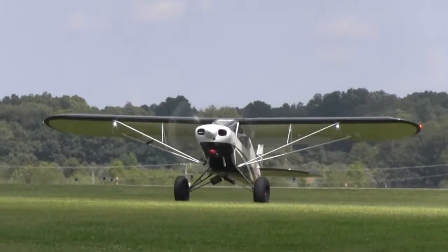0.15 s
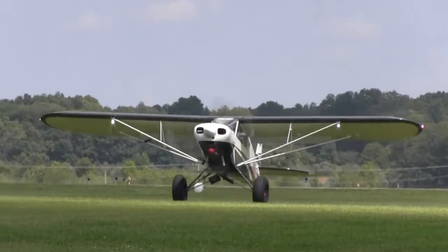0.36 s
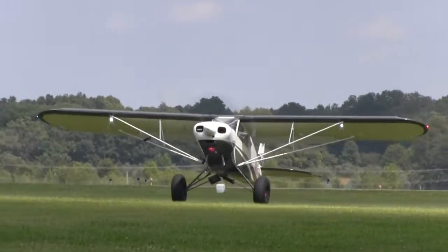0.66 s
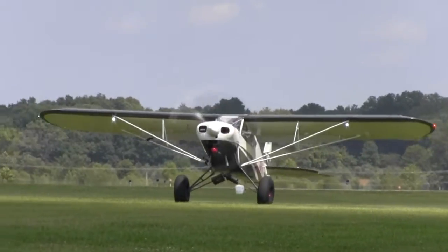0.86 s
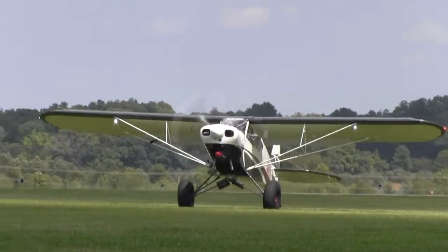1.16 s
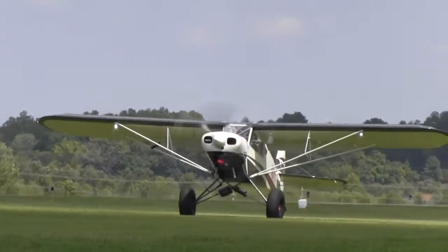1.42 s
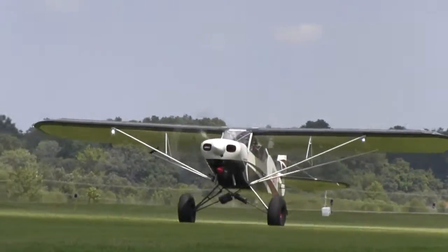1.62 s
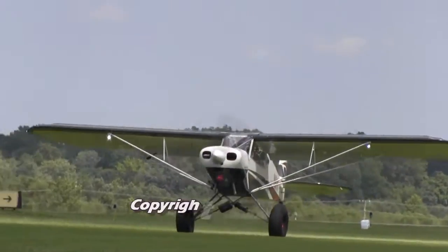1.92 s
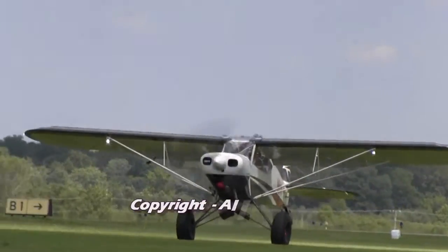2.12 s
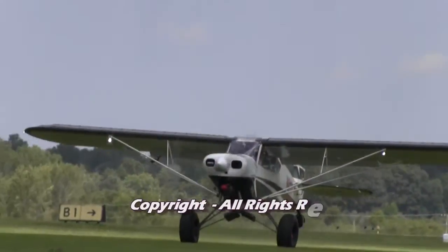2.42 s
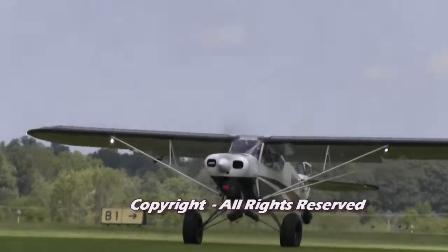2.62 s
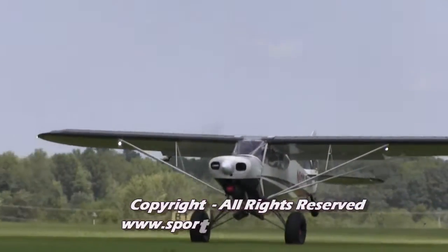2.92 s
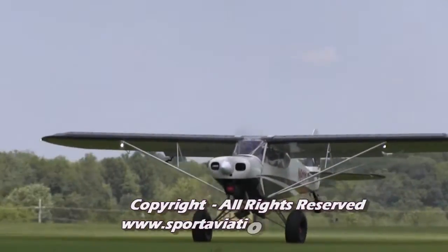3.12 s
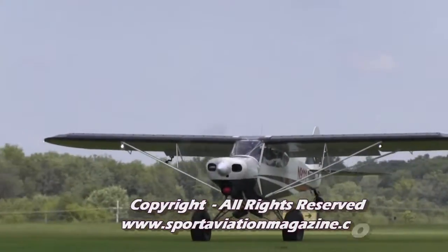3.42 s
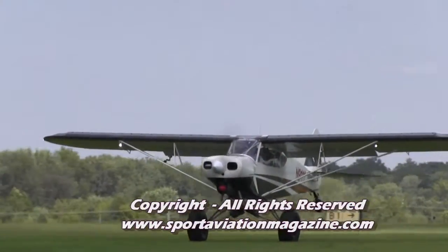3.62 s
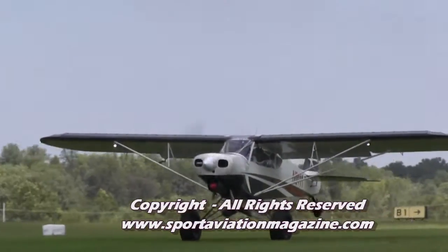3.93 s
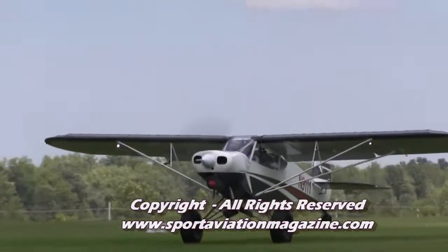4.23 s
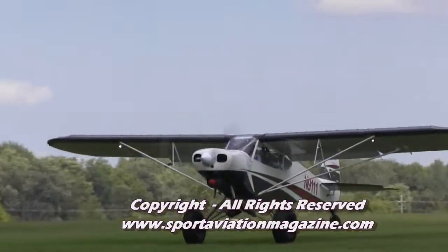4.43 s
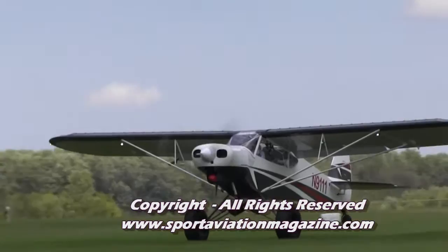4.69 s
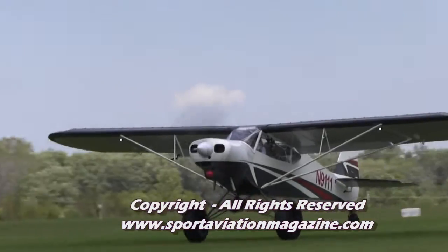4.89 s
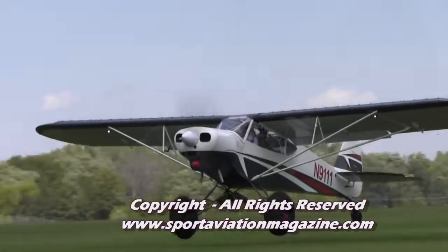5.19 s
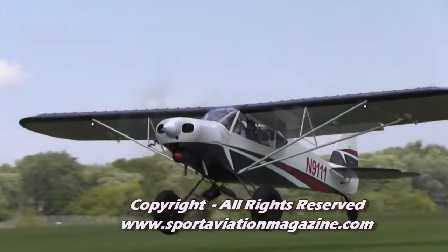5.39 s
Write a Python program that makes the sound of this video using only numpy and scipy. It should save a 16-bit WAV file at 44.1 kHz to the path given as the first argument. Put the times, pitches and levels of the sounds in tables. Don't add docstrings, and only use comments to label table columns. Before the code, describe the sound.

Outdoors on an open grass airstrip, a four-cylinder propeller aircraft runs at full power toward a stereo microphone. A low, buzzing drone starts fairly distant and wavers in the air, with faint cricket chirps on the right in the first second and a half. The engine note creeps slightly upward as boom and airy hiss swell, loudest near five seconds, then holding strong, still close, at the end.

```python
import sys
import numpy as np
from scipy import signal
from scipy.fft import rfft, irfft
from scipy.io import wavfile
from scipy.ndimage import uniform_filter1d

SR = 44100
rng = np.random.default_rng(int(sys.argv[2]) if len(sys.argv) > 2 else 0)


def undo_db(level):
    steps = np.asarray(level, float) / 20
    return 10 ** steps


def digitize_waveform(pressure):
    field = np.atleast_2d(pressure).T
    bounded = np.clip(field, -1, 1)
    quanta = np.round(bounded * 32767).astype(np.int16)
    wavfile.write(sys.argv[1], SR, quanta)


N = 244755
TIME = np.arange(N) / SR


def evened(x):
    return x / np.sqrt(np.mean(abs(x) ** 2) + 1e-20)


def read(points, hz, axis=1):
    rows = np.transpose(points)
    return np.interp(np.log(hz + 1), np.log(rows[0] + 1), rows[axis])


def bell(u):
    return np.exp(-u ** 2 / 2)


def drift(rate_hz, count=1):
    spectrum = rfft(rng.standard_normal((count, N)))
    lowpass = np.exp(-(np.fft.rfftfreq(N, 1 / SR) / rate_hz) ** 2)
    return evened(irfft(spectrum * lowpass, N))


def over_time(table):
    return np.interp(TIME, *np.transpose(table))


STAGES = [
    1.0,
    3.6,
    4.82,
]


def approach(values):
    return np.interp(TIME, STAGES, values)


# time_s, speed_rpm
SPEED = [(0.0, 2446.0), (0.5, 2469.8), (1.01, 2479.7), (1.51, 2497.9), (2.02, 2511.4), (2.52, 2527.6),
         (3.03, 2544.6), (3.53, 2560.4), (4.04, 2577.4), (4.54, 2594.5), (5.05, 2603.9), (5.55, 2620.7)]


def cycle():
    return np.cumsum(over_time(SPEED)) / 120 / SR


# place in the cycle (0-1) far, midway, close; level_db far, midway, close
CYLINDERS = [(0.878, 0.863, 0.858, 0, 0, 0), (0.107, 0.106, 0.085, -0.1, -1.4, -8.3),
             (0.3, 0.346, 0.391, -8.7, -9.4, -8.8), (0.596, 0.603, 0.568, -2.8, -9.8, -8.4)]
# time_s, level_db
BOOM_LEVEL = [(0.0, -31.0), (0.7, -27.5), (1.25, -29), (1.55, -27), (1.95, -28), (2.4, -25.5),
              (3.02, -24.5), (3.6, -23), (4.1, -20.5), (4.77, -17.5), (5.2, -20.5), (5.55, -21)]
RING_PHASE = [0.25, -0.36, -0.99]
# multiple of the cycle rate, level_db far, midway, close
ORDERS = [(4, -8.5, -17, -9), (5, -22, -26, -37), (6, -20, -26, -16), (7, -20.5, -23, -18),
          (8, -2, -13.5, 0.5), (9, -4, -11.5, -1.5), (10, -7, -8, -1), (11, -1, -9, 2), (12, 3, 0.5, 0),
          (13, -8.5, -14, 3), (14, -29, -14.5, -10), (15, -7, -22, -9), (16, -8, -6.5, 2.5),
          (17, -14, -34, -9.5), (18, -37, -33, -11), (19, -53, -31, -34), (20, -14, -25.5, -23),
          (21, -48, -45, -49), (22, -32, -57, -55), (23, -47, -41, -26), (24, -50, -33.5, -18),
          (25, -50, -30, -56), (26, -37, -54, -21), (27, -60, -55, -33), (28, -34, -30.5, -11),
          (29, -23.5, -21.5, -12), (30, -28, -32, -33), (31, -32, -30, -15.5), (32, -25, -23, -11.5),
          (33, -50, -37, -9.5)]
UPPER_LEVEL = [-29, -22, -23.5]
MID_ORDER_LEAD = [1.1, .4, -.3]


def boom(turns):
    tailpipe_order, fall_db_per_order, upper_scatter_db = 42.45, 0.96, 3.5
    lead_order, uneven_firing_db = 16, 0.7
    place, pulse_db = np.split(np.array(CYLINDERS), 2, axis=1)
    flutter = drift(1.75, count=4)
    upper_db = np.add(UPPER_LEVEL, upper_scatter_db * rng.standard_normal(size=(21, 3)))
    upper = []
    for order, row in enumerate(upper_db, start=34):
        upper.append((order, *(row - fall_db_per_order * abs(order - tailpipe_order))))
    out, power = np.zeros(N), 1e-12
    for order, *stage_db in ORDERS + upper:
        order = round(order)
        pulses = -np.sum(undo_db(pulse_db) * np.exp(-2j * np.pi * order * place), axis=0)
        phase = approach(np.unwrap(np.angle(pulses) + RING_PHASE))
        phase -= max(order - 18, 0) ** 2 / 30
        phase += bell((order - lead_order) / 2) * approach(MID_ORDER_LEAD)
        size = undo_db(approach(stage_db))
        shaken = (order / 12) ** 1.64 * flutter
        phase += 0.05 * shaken[order % 2]
        fading = undo_db(0.5 * shaken[2 + order % 2])
        out += size * fading * np.cos(2 * np.pi * order * turns + phase)
        power += size ** 2 / 2
    level_db = over_time(BOOM_LEVEL) + uneven_firing_db * drift(39.0)[0]
    return undo_db(level_db) * out / np.sqrt(power)


# place in the cycle (0-1),
# level_db far, midway, close
PUFFS = [
    (.80, 0, 2.5, -5),
    (0.03, -3.5, -2, -19),
    (0.26, -0.5, 3, -6),
    (0.5, -7, 3, -9),
    (0.07, -13, -20, 0.5),
]
WASH = [0.31, 0.21, 0.59]
CRACKLE = [-0.9, 0.5, 1.2]


def puffs(turns):
    chance = rng.standard_normal((int(turns[-1]) + 3, len(PUFFS)))
    size_db = 0.96 * np.clip(chance, -2, 1.6)
    power = approach(np.abs(WASH))
    for column, (place, *stage_db) in enumerate(PUFFS):
        since = turns - place + 1
        age = since % 1
        peak = undo_db(approach(stage_db) + size_db[since.astype(int), column]) ** 2
        power += peak * 2.46 * (1 - np.exp(-age / 0.04)) * np.exp(-age / 0.05)
    rasp = undo_db(approach(CRACKLE) * drift(330.0)[0])
    return evened(rasp * np.sqrt(power / uniform_filter1d(power, size=8000)))


# time_s, level_db
RUSH_LEVEL = [(0.0, -40), (0.5, -37.5), (1.0, -37.5), (1.5, -37.5), (1.9, -36), (2.25, -33), (2.6, -32.5),
              (3.05, -27.5), (3.4, -30.5), (3.75, -29), (4.1, -26), (4.45, -23.5), (4.75, -19), (5.0, -16),
              (5.2, -18.5), (5.4, -16.5), (5.55, -17)]
# pitch_hz, density_db (per Hz)
RUSH_SHAPE = [(480, -22.5), (650, -7), (1000, -0.5), (3500, 1), (6000, -4), (9500, -12.5), (14000, -21),
              (15700, -31)]
# pitch_hz, likeness (0-1)
LIKENESS = [(300, .98), (520, 0.25), (700, 0.95), (1500, 0.99), (2200, 0.82), (3500, 0.93), (5500, 0.96),
            (8000, 0.79), (11000, 0.87), (13000, 0.96)]
# middle_s, pitch_hz, level_db, spread_s
GUSTS = [(0.28, 970, -2.5, 0.072), (1.46, 3350, 4, 0.068), (1.99, 5000, 2, 0.12), (2.09, 1500, -3, 0.051),
         (2.3, 5400, -2.5, 0.06), (2.54, 4420, 4, 0.075), (2.65, 1900, 3.5, 0.25), (2.79, 1450, 1, 0.21),
         (3.07, 3500, 5, 0.08), (3.17, 1690, -2, 0.11), (3.52, 2600, -2.5, 0.022), (3.83, 1340, -4.5, 0.13),
         (3.87, 750, -3, 0.5), (3.87, 9030, 1.5, 0.091), (4.18, 1910, -1.5, 0.07),
         (4.21, 8490, -3.5, 0.069), (4.46, 3230, -2, 0.37), (4.56, 12400, 2.5, 0.54),
         (4.77, 2140, -2.5, 0.06), (4.98, 2640, 4, 0.067), (5.09, 1030, -2.5, 0.049),
         (5.36, 6900, -3.5, 0.05), (5.46, 3440, 5.5, 0.025), (5.5, 920, -5, 0.027)]
# middle_s, pitch_hz, level_db, spread_s
EDDIES = [(0.35, 2610, 6.0, 0.076), (0.7, 660, -16, 0.25), (0.91, 1290, 5.0, 0.2), (1.39, 2650, 3, 0.5),
          (1.46, 940, 6, 0.2), (1.5, 1420, 10, 0.083), (1.6, 744, -24, 0.17), (1.92, 1320, -8, 0.075),
          (2.12, 935, -21, 0.22), (2.3, 4060, 3.5, 0.65), (2.4, 2780, 8, 0.14), (2.7, 1910, -3, 0.12),
          (2.72, 1720, 3.5, 0.15), (2.8, 2150, 5, 0.1), (2.93, 660, -7.0, 0.12), (3.1, 2960, 3.5, 0.11),
          (3.45, 786, 0.5, 0.37), (3.59, 1360, -4.0, 0.35), (3.9, 820, 10, 0.42), (4.11, 1030, 9.5, 0.26),
          (4.53, 570, 10, 0.16), (4.74, 13800, 1.5, 0.5), (5.09, 900, -3, 0.098), (5.22, 2010, 3.0, 0.36),
          (5.33, 734, 13.5, 0.12)]


def rush(turns):
    treble_hz, treble_gain = 7200, 0.04
    gust_share, eddy_share = 0.25, 0.062
    frames, hz = N // 128 + 8, np.fft.rfftfreq(512, 1 / SR)
    a, b, c, d, short, long = rng.standard_normal((frames, len(hz), 6)).T
    short = uniform_filter1d(short, size=3, axis=0)
    short = evened(uniform_filter1d(short, size=4, axis=1))
    long = uniform_filter1d(long, size=2, axis=0)
    long = evened(uniform_filter1d(long, size=50, axis=1))
    t = np.arange(frames) * 128 / SR
    level_db = np.interp(t, *np.transpose(RUSH_LEVEL))
    octaves = np.log2(np.maximum(hz / treble_hz, 1))
    field_db = read(RUSH_SHAPE, hz)[:, None] + level_db + 1.99 * short + 1.7 * long
    field_db += treble_gain * np.outer(octaves, level_db - level_db.mean())
    for table, share in ((GUSTS, gust_share), (EDDIES, eddy_share)):
        for middle, pitch, change_db, spread in table:
            region = bell(np.log((hz + 1) / pitch) / share)
            field_db += change_db * np.outer(region, bell((t - middle) / spread))
    same = np.clip(read(LIKENESS, hz), -1, 1)[:, None]
    left = a + 1j * b
    right = same * left + np.sqrt(1 - same ** 2) * (c + 1j * d)
    spectrum = np.array([left, right]) * undo_db(field_db)
    throb = puffs(turns)
    return undo_db(-14.0) * throb * signal.istft(spectrum, nperseg=512, noverlap=384)[1][:, :N]


# pitch_hz, density_db (per Hz)
RUMBLE_SHAPE = [(15, -6), (30, -13), (60, -9), (120, -1), (250, 7), (400, -3.5), (520, -12.5), (800, -31)]


def rumble():
    noise = rng.standard_normal((2, N))
    noise[1] = 1.1 * noise[0] + 0.52 * noise[1]
    shape = undo_db(read(RUMBLE_SHAPE, np.fft.rfftfreq(N, 1 / SR)))
    low = evened(irfft(rfft(noise) * shape, N))
    return undo_db(over_time(BOOM_LEVEL) + 2.2 * drift(1.3)) * undo_db(-15.5) * low


# start_s, level_db, length_s
CHIRPS = [
    (.405, -61, .04),
    (.625, -58, .045),
    (.865, -58, .04),
    (1.04, -58, .04),
    (1.225, -58, .045),
    (1.42, -57, .05),
]


def cricket():
    ring_hz, width_hz = 9200, 330
    clicks, t = np.zeros(N), np.arange(400) / SR
    for start, level_db, length in CHIRPS:
        count = round(length * SR)
        struck = rng.random(4410)[:count] < 0.1
        teeth = struck * rng.choice([-1, 1], 4410)[:count]
        clicks[round(start * SR):][:count] += undo_db(level_db) * teeth * signal.windows.tukey(count, 0.3)
    ring = np.sin(2 * np.pi * ring_hz * t) * t * np.exp(-np.pi * width_hz * t)
    return undo_db(19) * signal.oaconvolve(clicks, ring / np.linalg.norm(ring))[:N]


def scene():
    turns = cycle()
    aircraft = boom(turns) + rush(turns) + rumble()
    return aircraft + cricket() * undo_db(np.array([[-6.0], [1.5]]))


def band_limit(x):
    return signal.sosfilt(signal.butter(12, 15780, fs=SR, output="sos"), x)


# pitch_hz, width_hz, left_db, right_db
HOUSING = [(518, 67, -3.5, 10), (854, 355, 4.5, 4), (1000, 148, -8, 1.5), (1140, 88, 2, -6.5),
           (1266, 215, 2.5, 3), (1530, 85, -13, -6), (1544, 186, 4.5, 10), (1864, 66, -14, -5),
           (2230, 140, 2.5, 2.5), (2506, 240, -6.5, -2), (2940, 220, -1, 1.5), (3050, 600, 2, 0),
           (3580, 410, -6.5, -2), (3810, 260, 3.5, 3.2), (4200, 250, -2.5, -2.2), (5270, 53, 0.5, 0.5),
           (5730, 510, -0.5, 0.5), (5980, 200, -4.5, -2), (6150, 114, 4, -0.5), (7200, 130, 2, -0.5),
           (7400, 190, -0.5, 2), (7860, 230, -1, 3), (8930, 550, 3.5, 3), (10100, 300, 1.5, -2.5),
           (12400, 280, 2, 3), (12800, 580, 3.5, 4.5)]
# pitch_hz, left_minus_right_db
TILT = [(30, -4.5), (80, -1), (120, -1.5), (170, -1), (200, 0.5), (260, 4), (300, -2.7), (390, 5.5),
        (440, 5.5), (600, 3), (15000, -0.4)]


def record(dry):
    hz = abs(np.fft.fftfreq(8192, 1 / SR))
    colour_db = np.array([[0.5], [-0.5]]) * read(TILT, hz)
    for pitch, width, *ports_db in HOUSING:
        colour_db = colour_db + np.array(ports_db)[:, None] / (1 + (2 * (hz - pitch) / width) ** 2)
    colour = np.exp(np.conj(signal.hilbert(np.log(undo_db(colour_db)))))
    response = np.fft.ifft(colour).real[:, :4096]
    ports = signal.oaconvolve(dry, response, axes=1)[:, :N]
    ports = ports / (1 + abs(ports) ** 6) ** (1 / 6)
    return band_limit(0.88 * ports)


dry = scene()
out = record(dry)
digitize_waveform(out)
```